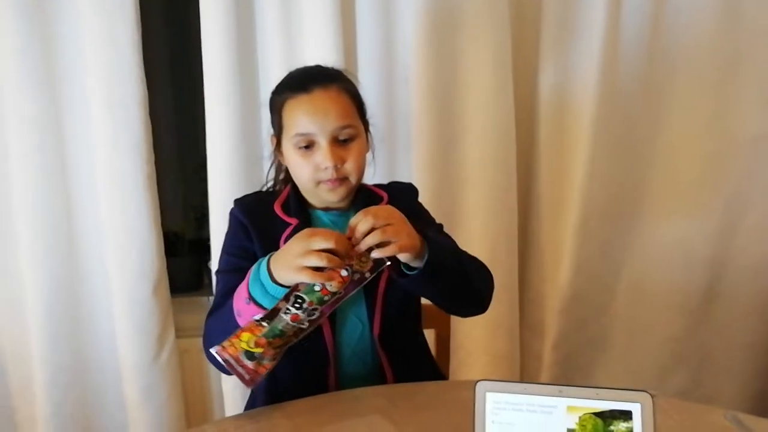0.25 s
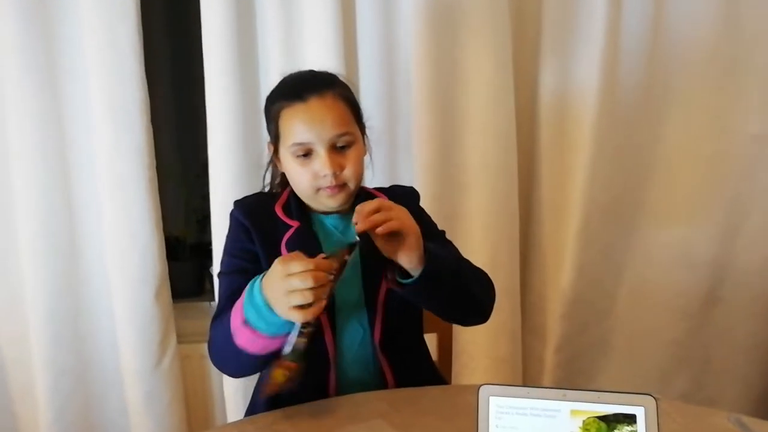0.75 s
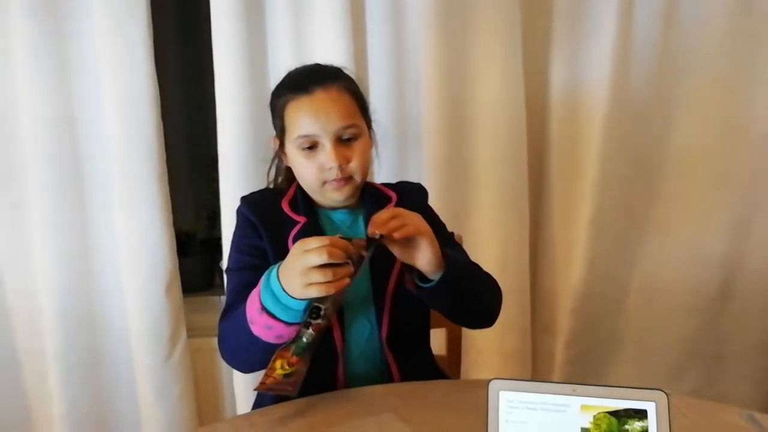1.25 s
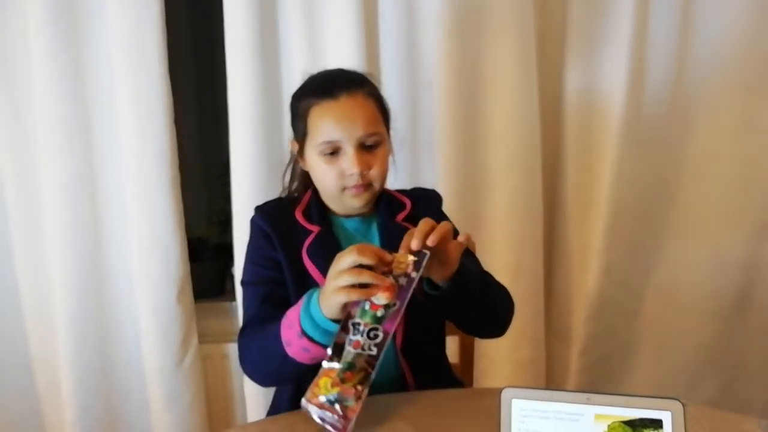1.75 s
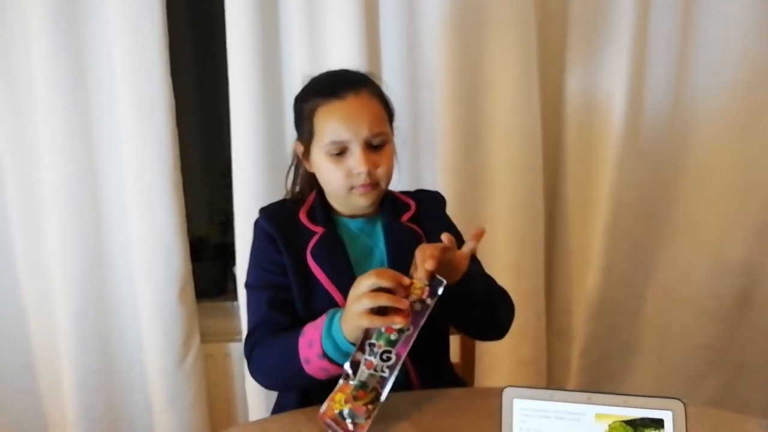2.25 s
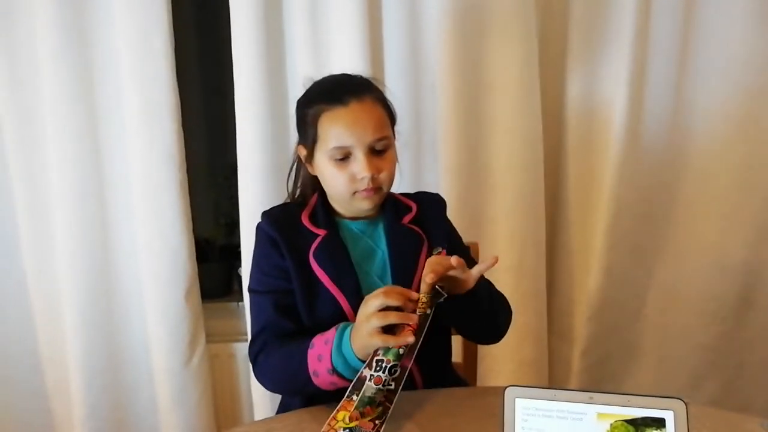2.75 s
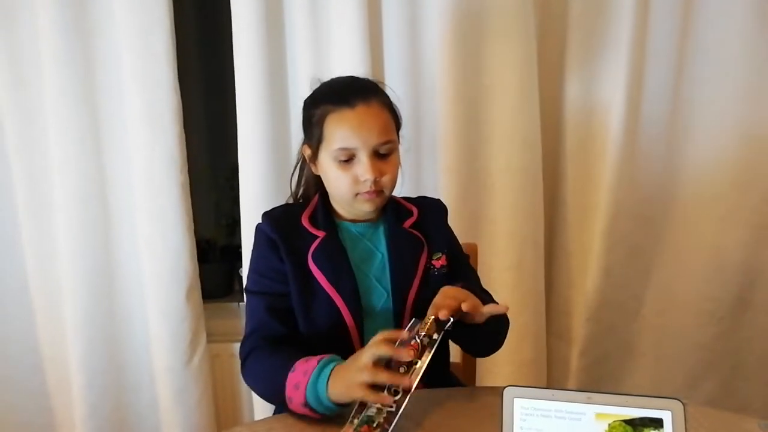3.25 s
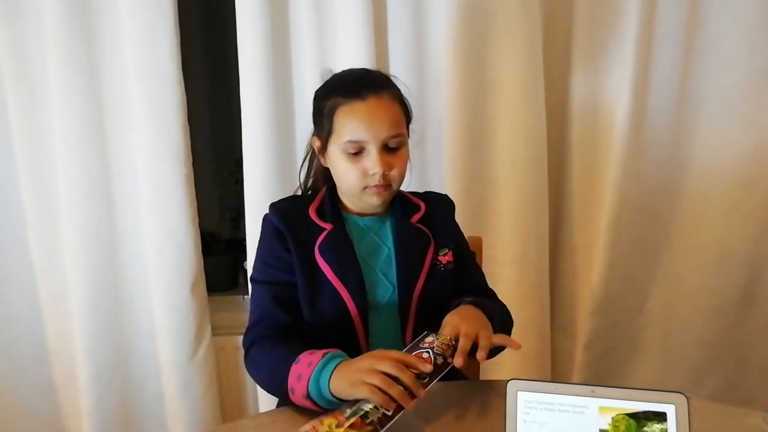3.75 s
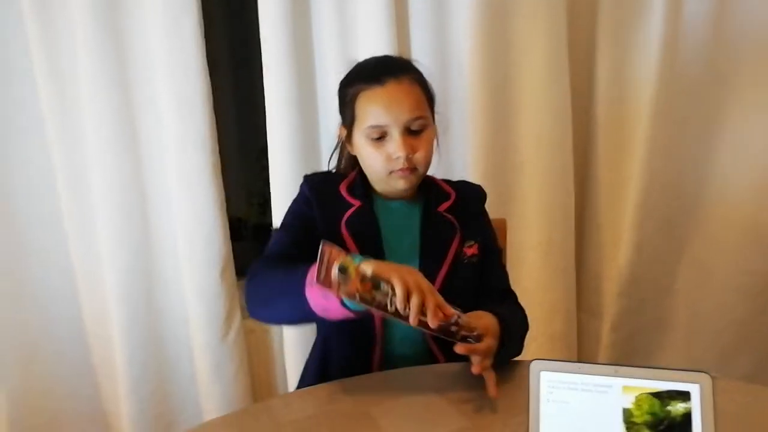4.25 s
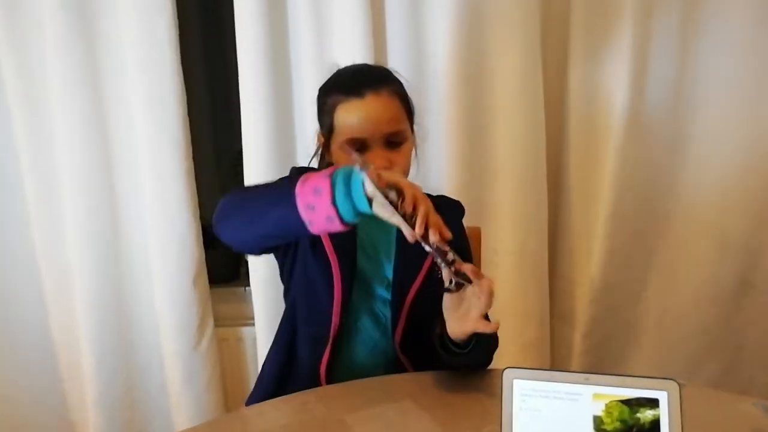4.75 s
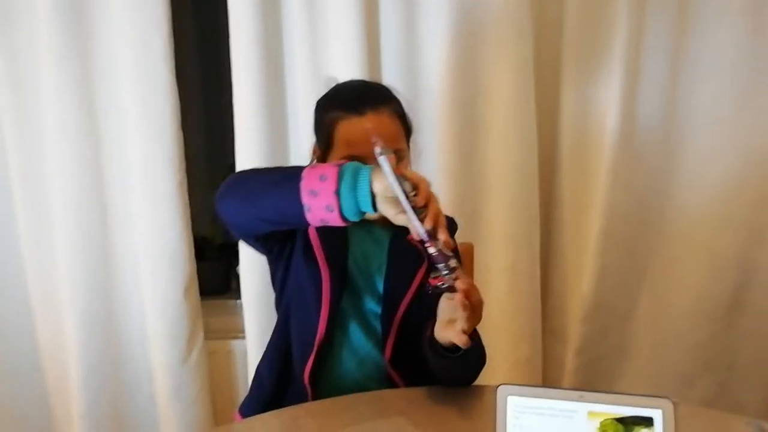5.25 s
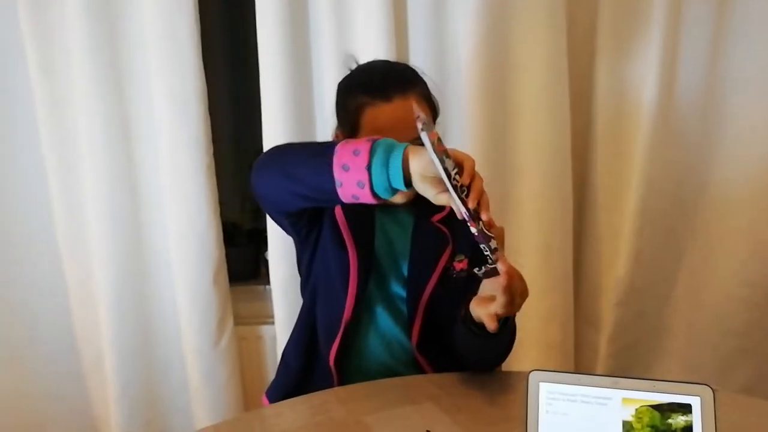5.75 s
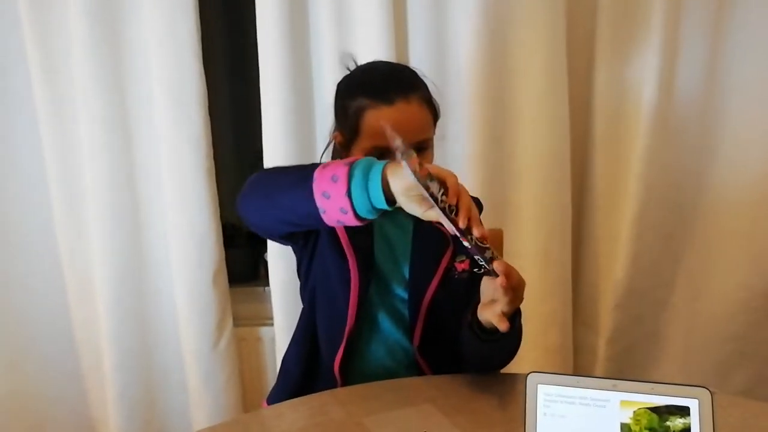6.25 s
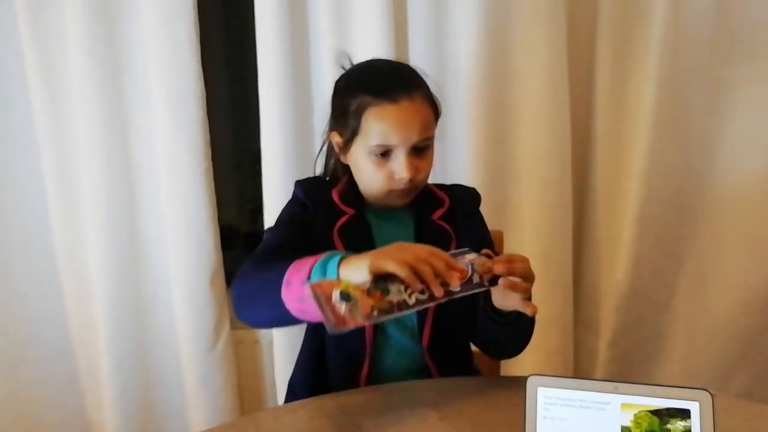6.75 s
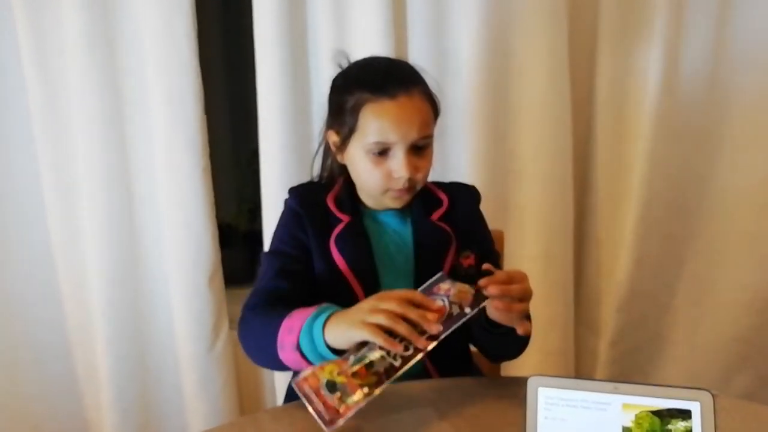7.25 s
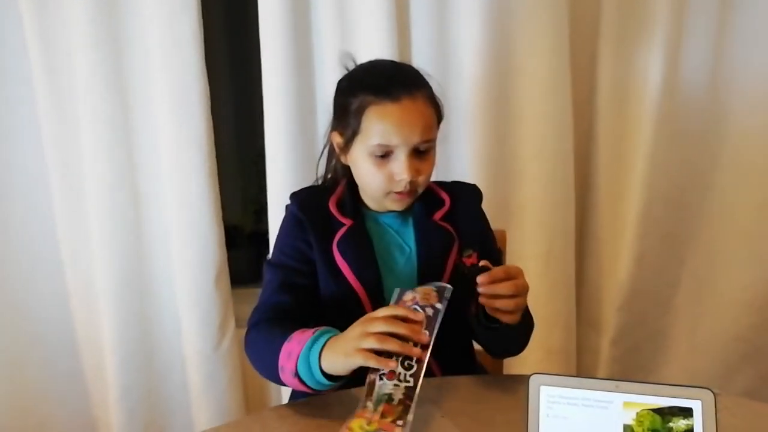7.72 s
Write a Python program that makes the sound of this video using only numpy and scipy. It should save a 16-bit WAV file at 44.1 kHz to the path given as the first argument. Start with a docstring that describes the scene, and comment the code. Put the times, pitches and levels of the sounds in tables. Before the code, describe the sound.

A stiff plastic snack packet is pulled and twisted by hand, giving sharp irregular crackles and snaps in a quiet room, thinning out near the end.

```python
"""In a quiet, curtained room, a plastic snack packet is pulled and twisted open by hand at a table.
Buckling creases in the stiff film are short noise bursts with a ring; many tiny ones make the crackle.
A table bounce and a decaying tail answer both. The bag's flaps are fading bands of noise, the dry knocks
are damped tones with a click, and the rumbling sleeves, room air and microphone hiss are shaped noise."""
import sys
import numpy as np
from scipy import signal
from scipy.fft import rfft, irfft
from scipy.io import wavfile

SR = 44100
rng = np.random.default_rng(int(sys.argv[2]) if len(sys.argv) > 2 else 0)


def unload_audio(sound):
    """Save the sound as a 16-bit wav file, at the path given as the first command line argument."""
    columns = np.transpose(np.atleast_2d(sound))
    # keep every value between -1 and 1, then stretch to whole-number steps
    steps = np.round(np.clip(columns, -1, 1) * 32767)
    wavfile.write(sys.argv[1], SR, steps.astype(np.int16))


N = 352024

# large creases that buckle: (time [s], relative level [dB], body gain up to 1.6 kHz [dB],
# edge gain from 8 kHz up [dB], ring of the flipped panel [Hz])
CREASES = [(0.0062, -17.5, -3, 6, 6000), (0.374, -27, 3.5, -0.5, 4200), (0.4198, -26.5, -0.5, 6.5, 2950),
           (0.486, -20.5, 0.5, 4.5, 5070), (0.5627, -29.5, 11, 2.5, 1970),
           (0.5932, -34.5, -6.5, -2.5, 9000), (0.684, -36, 10, -11, 1080), (0.7107, -22, 5.5, -3, 2070),
           (0.7192, -19, 0.5, 7.5, 3770), (0.7475, -21, 4.5, 0.5, 5130), (0.7624, -21, 1, 5.5, 9600),
           (0.7723, -19, -24, 6, 9660), (0.793, -18.5, -19.5, 10, 6800), (0.963, -31, 1, -1, 5950),
           (0.986, -33, 2, -10, 4270), (1.2, -46.5, 9, -9, 3730), (1.2237, -47, 11, -23, 4700),
           (1.4493, -27.5, -6, -4.5, 7500), (1.4913, -22, -4.5, -10, 3250), (1.5658, -29, 11, -0.5, 3740),
           (1.799, -34, 4, 0, 3270), (1.816, -31, 9.5, -5, 4760), (1.9064, -42.5, -12, -1, 5030),
           (1.9525, -41, -2, -4, 4700), (1.9768, -33, 5, -28, 3200), (2.0008, -24, 2.5, 0, 4700),
           (2.2636, -57.5, -28, 11, 7900), (2.45, -27, -7.5, -5.5, 4700), (2.506, -23, -4, 2, 5800),
           (2.5157, -15, -3.5, -1, 10300), (2.593, -21.5, -1.5, -3.5, 2330), (2.613, -18.5, 4, 0.5, 3680),
           (2.649, -14, -2, -5, 9900), (2.6832, -15.5, -12, 3, 3840), (2.9035, -20.5, -21, -1, 2880),
           (2.9276, -22.5, -3, -26, 3600), (2.9553, -32.5, 2, -2, 3400), (2.9767, -27.5, 9, 2.5, 2440),
           (3.042, -37, 4, -2, 3340), (3.12, -35.5, 13.5, 1.5, 2640), (3.1343, -33, -6.5, -3, 2860),
           (3.2227, -30, -7, 4.5, 4360), (3.4024, -29.5, 3.5, 0.5, 4330), (3.443, -28, 9.5, -8, 6840),
           (3.5132, -14, -15, -2, 8700), (3.5895, -17.5, -5, 8, 6340), (3.7052, -34.5, 2.5, -3, 6400),
           (3.7871, -25.5, 5, 6.5, 1400), (3.7975, -12.5, -10, -13.5, 3000), (3.8132, -19.5, 2, 1.5, 7240),
           (3.879, -29.5, -15, -3, 4300), (3.8929, -24.5, 8.5, -2, 2700), (3.9614, -17, -2, -13, 2970),
           (4.0169, -21.5, 10.5, 2, 4020), (4.0473, -21, 5.5, -0.5, 3200), (4.093, -25.5, -17, -4.5, 4400),
           (4.179, -34.5, 5, -3, 3920), (4.19, -16.5, 4, -4.5, 3900), (4.3697, -17.5, 1.5, -1.5, 5530),
           (4.4631, -38.5, 23, 7, 3400), (4.4934, -34, 0, 9, 4300), (4.5421, -20.5, -1.5, -21, 2300),
           (4.5513, -23, -21, 0.5, 6300), (4.5643, -21.5, 2, -3.5, 3340), (4.685, -30.5, 8.5, -5.5, 8900),
           (4.729, -24.5, 3.5, -1, 6400), (4.809, -26, -2.5, 11, 5670), (4.8361, -23.5, 1.5, -5, 4600),
           (5.1336, -45, -6, 2, 6640), (5.2423, -40.5, 0, 4, 5400), (5.3694, -33, 10, -1, 6950),
           (5.3924, -28.5, -6, 6.5, 2860), (5.469, -21, -5, -6.5, 2460), (5.4982, -23, -10, 4, 2900),
           (5.509, -20, -5, 0, 2700), (5.5189, -19, -5, -5, 6100), (5.549, -21.5, -3.5, -31, 2850),
           (5.6499, -24, -21, 6, 6060), (5.7542, -35, -22, -0.5, 9500), (5.8105, -40.5, -12, 7, 6360),
           (5.833, -32, -6, 4, 2960), (5.8702, -27, 7.5, -22, 1380), (5.8851, -27.5, 3.5, 9, 3000),
           (6.0396, -42.5, 15, -3, 1350), (6.077, -48, -19, 11, 1400), (6.0888, -28.5, 12, -5.5, 2900),
           (6.12, -34, 8, -14, 2290), (6.278, -41, 3, 7, 7700), (6.3704, -34.5, 2, -9, 2100),
           (6.4636, -38, -49, 10, 5860), (6.5374, -34.5, -29, 4.5, 5000), (6.6272, -29.5, -42, 8, 5370),
           (6.677, -33, -24, -4, 5970), (6.7798, -45, 4.5, -3, 3830), (6.8564, -41.5, -2, 3, 4430),
           (7.1478, -47, 2, 8, 2600), (7.32, -39.5, -29, 8.5, 5700), (7.415, -43.5, 9, -7, 2400)]


def snaps(peak_db, level_db=-4.0, peak_octaves=0.15, scatter_db=1, size=512):
    """Snap-through buckling: wide panels give body, tight folds give edge, and the panel rings briefly."""
    out = np.zeros((2, N))
    for s, db, body_db, edge_db, ring_hz in CREASES:
        burst = buckle(crack_s=0.0005, ring_s=0.0017, ring_db=2, same=0.85)
        tone = [(1600, body_db), (3200, 0.0029), (5500, 0.015), (8000, edge_db)]

        def shape_db(hz):
            octaves_away = np.log2((hz + 1) / ring_hz)
            return read(tone, hz) + peak_db / (1 + (octaves_away / peak_octaves) ** 2)

        snap = colour(np.pad(burst, ((0, 0), (0, size))), shape_db, size=512)
        # what one port gains the other loses, on average in favour of the left
        balance_db = scatter_db * rng.uniform(-0.47, 1) * np.array([[1], [-1]])
        add(out, s, snap * gain_of(level_db + db + balance_db))
    return out


def buckle(crack_s, ring_s, ring_db, same, size=256):
    """Impulsive release: a crease flips with a crack and a few milliseconds of flutter, both decaying."""
    t = np.arange(size) / SR
    decay = np.exp(-t / crack_s) + gain_of(ring_db) * np.exp(-t / ring_s)
    left, right = pair(size, same) * decay
    lag = rng.integers(4)  # the right port hears it 0 to 3 samples later
    return np.array([evened(left), evened(np.pad(right, (lag, 0))[:size])])


# resonances of the bag's air pocket, sounded by sliding film: (frequency [Hz], width [Hz], level [dB])
AIR_POCKET = [(1280, 110, -4), (3135, 160, -6)]
# how strongly the pocket rings: (time [s], level before flutter [dB])
POCKET_RINGING = [(0, -23), (4.9, -12), (5.3, -10), (6, -9.5), (6.3, -13), (6.6, -25.5)]


def crackle(level_db=-2, rub_db=-12, wander=0.074, wander_hz=7, flutter_db=3, flutter_hz=35,
            patchy_db=2, patchy_hz=55):
    """Amplitude modulation: finger work drives tiny creases, sliding hiss and the air pocket's resonance."""
    bend = 1 + wander * drift(wander_hz)
    flutter = gain_of(follow(POCKET_RINGING) + flutter_db * drift(flutter_hz))
    pocket = 0
    for hz, width, db in AIR_POCKET:
        pocket = pocket + gain_of(db) * evened(resonate(pair(N, 0.24), hz * bend, width))
    rub = gain_of(rub_db) * pair(N, 0.98)
    spectrum = rfft(grains() + rub + flutter * pocket)
    # taut film is bright, slack film dull: work() tilts four overlapping bands,
    # and each flickers as the folds shift
    centres = np.array([1200, 2500, 5000, 9000])  # Hz
    hz = np.fft.rfftfreq(N, 1 / SR)
    out = 0
    for centre, share in zip(centres, np.eye(len(centres))):
        band = irfft(spectrum * read(np.transpose([centres, share]), hz), N)
        flicker = gain_of(level_db + patchy_db * drift(patchy_hz))
        out = out + band * flicker * work(np.log2(centre / centres[2]))
    return out


def grains(base_per_s=600, spread_db=3.0, count=20):
    """Clustered shot noise: tiny creases of unequal size and colour, whose rate drifts into clumps."""
    clumps = np.exp(0.9 * drift(60))
    happens = rng.random(N) < base_per_s / SR * clumps
    sizes = gain_of(spread_db * np.minimum(rng.exponential(1, N), 4)) * happens
    kind = rng.integers(0, count, N)
    out = np.zeros((2, N))
    for k in range(count):
        tone = np.transpose([np.geomspace(600, 11000, 12), 5 * rng.standard_normal(12)])  # Hz, dB
        burst = buckle(crack_s=0.00027, ring_s=0.0053, ring_db=-11.0, same=0.51)
        grain = colour(burst, lambda hz: read(tone, hz), size=256)
        out += signal.oaconvolve((sizes * (kind == k))[None], evened(grain), axes=1)[:, :N]
    return evened(out)


# pulls and twists of the fingers: (start [s], length [s], relative level [dB], brightness [dB/octave])
FINGER_PULLS = [(0.577, 0.076, -54, -8.5), (0.738, 0.098, -25.5, -1), (0.97, 0.0093, -44, -3),
                (1.088, 0.011, -52.5, -2), (1.245, 0.023, -52.5, -1.5), (1.384, 0.049, -62, -8),
                (1.606, 0.027, -32.5, -2), (1.912, 0.061, -44.5, 0), (2.263, 0.36, -53.5, -2),
                (2.619, 0.064, -32, 3.5), (2.768, 0.19, -53.5, -1.5), (2.896, 0.063, -37, -0.5),
                (3.114, 0.13, -40.5, -3), (3.348, 0.13, -40.5, 0), (3.523, 0.071, -36, -0.5),
                (3.73, 0.07, -38.5, -5.5), (4.014, 0.078, -53, 2), (4.265, 0.07, -34, -.5),
                (4.428, 0.06, -36.5, -4), (4.529, 0.044, -29, -1.5), (4.625, 0.35, -39, 0),
                (5.09, 0.44, -49.5, -0.5), (5.385, .04, -36, -1), (5.489, 0.12, -37, 2),
                (5.658, 0.051, -33, -0.5), (5.854, 0.074, -36, 1), (5.95, 0.08, -47, -5.5),
                (6.099, 0.013, -41.5, -5.5), (6.227, 0.044, -49.5, 1.5), (6.552, 0.051, -43.5, -4),
                (6.672, 0.011, -51.5, -7.5), (6.82, .03, -58, -4), (7.15, 0.019, -52.5, -5),
                (7.202, 0.048, -51.5, -3), (7.254, 0.097, -51, -2.5), (7.721, 0.073, -59.5, -0.5)]
GRIP_DB_PER_S, LET_GO_DB_PER_S = 645, 269  # a pull builds quickly and lets go more slowly
HOLDING_DB, HOLDING_TILT_DB = -69, -5.5  # packet merely held: relative level, brightness per octave
# a flurry of tiny creases around every snap; its brightness partly follows the snap's
FLURRY_DB, FLURRY_DB_PER_S, FLURRY_RISE_DB_PER_S = -11, 377.5, 6000
FLURRY_TILT_DB, FLURRY_TILT_SHARE = -3.5, 0.13


def work(octave):
    """Power summation of holding, pulls and flurries, in a band so many octaves above 5 kHz."""
    t = np.arange(0, N / SR, 1 / 1000)
    power = gain_of(HOLDING_DB + HOLDING_TILT_DB * octave) ** 2
    for s, length, db, tilt_db in FINGER_PULLS:
        build_db = GRIP_DB_PER_S * (t - s)
        release_db = LET_GO_DB_PER_S * (s + length - t)
        shape_db = np.minimum(np.minimum(build_db, release_db), 0)
        power = power + gain_of(db + tilt_db * octave + shape_db) ** 2
    for s, db, body_db, edge_db, _ in CREASES:
        shape_db = np.minimum(FLURRY_RISE_DB_PER_S * (t - s), FLURRY_DB_PER_S * (s - t))
        tilt_db = FLURRY_TILT_DB + FLURRY_TILT_SHARE * (edge_db - body_db)
        power = power + gain_of(db + FLURRY_DB + tilt_db * octave + shape_db) ** 2
    return np.interp(np.arange(N) / SR, t, np.sqrt(power))


# what the film radiates: (frequency [Hz], gain [dB])
FILM_RADIATION = [(60, -48.5), (220, -25), (480, -24), (800, -16.5), (1300, -11), (2000, -8), (3100, -3.5),
                  (4200, -1), (6500, 0.5), (8000, 0.5), (9500, 1), (10600, -12), (12000, -17), (15500, -28)]


def radiate(x):
    """Radiation efficiency: thin film gives off little bass and most strongly the upper treble."""
    return colour(x, lambda hz: read(FILM_RADIATION, hz))


def varied_echo(x, count=4):
    """Equal-power crossfading: steadily through a few random echo patterns, so no fixed colouring stands out."""
    place = np.arange(N) / SR * 7  # seven patterns a second
    out = 0
    for k in range(count):
        away = abs((place - k) % count - count / 2)
        out = out + room(x * np.cos(np.pi / 2 * np.minimum(away, 1)))
    return out


# the room's echo: (frequency [Hz], relative level [dB], decay time to -60 dB [s])
ROOM_DECAY = [(250, 0.5, 0.075), (1000, -4, 0.37), (2200, -5, 0.21), (4940, -7, 0.21), (9000, -6.5, 0.22),
              (14000, -6.5, 0.12)]


def room(x, table_s=0.0064, table_db=-13, first_s=0.0056, size=22050):
    """Reverberation: one clear table reflection, and a short, exponentially decaying tail of sparse echoes."""
    t = np.arange(size) / SR
    sparse = rng.random((2, size)) < 5000 / SR  # about 5000 reflections a second
    taps = rng.choice([-1., 1.], (2, size)) * sparse * (t > first_s)
    hz, frame_s, z = signal.stft(taps, SR, nperseg=128)
    t60 = read(ROOM_DECAY, hz, axis=2)[:, None]
    decay_db = -60 * np.maximum(frame_s - first_s, 0) / t60
    energy = t60 * SR / np.log(10 ** 6)  # of the decay, so that long tails are not louder in total
    z = z * gain_of(read(ROOM_DECAY, hz)[:, None] + decay_db) / np.sqrt(energy)
    tail = signal.istft(z, SR, nperseg=128)[1][:, :size] / np.sqrt(np.mean(taps ** 2))
    bounce = buckle(crack_s=0.0009, ring_s=0.003, ring_db=-8.0, same=1.0)
    add(tail, table_s, gain_of(table_db) * bounce / np.linalg.norm(bounce[0]))
    return signal.fftconvolve(x, tail, axes=1)[:, :N]


# the two microphone ports differ in colour: (frequency [Hz], left minus right [dB])
PORT_DIFFERENCE = [(200, 0), (600, -4), (1200, 1), (4200, -7.5), (6400, -6), (8000, -1), (9700, 5.5),
                   (12000, -2.5)]


def ports(x):
    """Interchannel level difference: half is added to the left port and half taken from the right."""
    return colour(x, lambda hz: np.outer([0.5, -0.5], read(PORT_DIFFERENCE, hz)))


# the whole bag flexes and pushes air: (time [s], relative level [dB], centre frequency [Hz])
BAG_FLEXES = [(0.713, -46.5, 218), (.752, -48, 264), (1.55, -55, 288), (2.645, -49.5, 350),
              (3.975, -45.5, 810), (4.348, -50, 250), (6.69, -60, 497)]


def puffs(level_db=0, fade_s=0.03, octaves=0.4):
    """Volume displacement: a flex of the whole bag gives a soft low flap of band noise that dies away."""
    out = np.zeros((2, N))
    t = np.arange(SR // 4) / SR
    for s, db, centre_hz in BAG_FLEXES:
        def shape_db(hz):
            return np.maximum(-3 * (np.log2((hz + 1) / centre_hz) / octaves) ** 2, -50)

        air = colour(pair(len(t), 0.3), shape_db)
        add(out, s, gain_of(level_db + db) * evened(air) * np.exp(-t / fade_s))
    return out


# dry knocks and bumps: (time [s], relative tick level [dB], tick pitch [Hz], thump level [dB],
# thump pitch [Hz])
DRY_KNOCKS = [(2.142, -42, 1280, -50, 160), (2.1632, -42, 1270, -48.5, 160), (3.910, -31.5, 1650, -31, 125),
              (4.156, -45.5, 1170, -41, 107), (4.2913, -38, 750, -32, 130),
              (4.3429, -24.5, 1140, -25.5, 138), (4.755, -44, 900, -45, 120),
              (4.793, -38.5, 1120, -48, 150), (5.522, -42, 800, -35, 204), (6.255, -52, 1310, -55, 110),
              (6.301, -53, 1060, -53, 131), (6.458, -54, 1140, -67, 150), (6.854, -48, 1140, -56, 180),
              (7.024, -46.5, 1060, -75, 198)]
# the knocks' short ring: (multiple of the tick pitch [ratio], relative level [dB], decay to -60 dB [s])
TICK_MODES = [(.68, -10.5, 0.018), (1, 2.5, 0.013), (2.2, -11.5, 0.0024)]


def knocks(thump_s=0.0017, tick_db=-2, click_db=-13, click_s=0.00079, lag_s=0.00081):
    """Damped modes: a click, a woody tick and a low push late on the left, too close to stir the room."""
    out = np.zeros((2, N))
    t = np.arange(SR // 10) / SR
    late = np.maximum(t - np.array([[lag_s], [0]]), 0)
    push = 2 * late / thump_s * np.exp(-late / thump_s)
    for s, hard_db, tick_hz, push_db, thump_hz in DRY_KNOCKS:
        tick = 0
        for ratio, db, t60 in TICK_MODES:
            tick = tick + gain_of(db - 60 * t / t60) * np.cos(2 * np.pi * tick_hz * ratio * t)
        click = gain_of(click_db) * pair(len(t), 0.58) * np.exp(-t / click_s)
        thump = push * np.sin(2 * np.pi * thump_hz * late)
        add(out, s, gain_of(hard_db + tick_db) * (tick + click) + gain_of(push_db) * thump)
    return out


# rustling cloth: (frequency [Hz], relative level [dB])
CLOTH_SPECTRUM = [(20, -16), (55, 2), (170, 0), (400, -14.5), (2000, -48)]
# sleeves and hands moving: (time [s], relative level [dB])
SLEEVE_MOTION = [(0, -55.5), (.26, -62), (.45, -56), (1.05, -59), (1.17, -75.5), (1.56, -65.5),
                 (1.9, -72.5), (3.7, -72), (3.95, -69), (4.33, -58.5), (5, -61), (5.08, -67), (5.2, -58.5),
                 (5.35, -68), (5.6, -54.5), (5.9, -75.5), (6.65, -62.5), (6.9, -76.5)]


def sleeves(level_db=-1, lumps_db=5.0, lumps_hz=45):
    """Friction noise: a soft rumble of cloth and moving hands, made lumpy by a random level."""
    rumble = colour(diffuse(), lambda hz: read(CLOTH_SPECTRUM, hz), size=8192)
    lumpy = rumble * gain_of(lumps_db * drift(lumps_hz))
    return evened(lumpy) * gain_of(level_db + follow(SLEEVE_MOTION))


# still room and microphone hiss: (frequency [Hz], relative level [dB])
QUIET_SPECTRUM = [(12, -39), (20, -1), (77, -9), (107, -15), (228, -26), (293, -17.5), (574, -25),
                  (1330, -25.5), (9140, -27), (16000, -34.5)]


def stillness(level_db=-73.5):
    """Stationary background noise: low room noise and microphone hiss, its level set on the port average."""
    air = colour(diffuse(), lambda hz: read(QUIET_SPECTRUM, hz), size=8192)
    return gain_of(level_db) * air / air.mean(0).std()


def diffuse():
    """Diffuse-field coherence: noise shared by the ports in the bass and unrelated higher up."""
    a, b = rng.standard_normal((2, N))
    apart_db = [(40, -14.0), (120, -11.0), (280, 2), (3000, 2)]  # Hz, dB
    apart = colour(b[None], lambda hz: read(apart_db, hz))[0]
    return np.array([a + apart, a - apart])


def pair(size, same):
    """Partial correlation: left and right noise with a shared part."""
    a, b = rng.standard_normal((2, size))
    return np.array([a, same * a + np.sqrt(1 - same ** 2) * b])


def drift(rate_hz):
    """Random modulation: normal random values, rate_hz of them a second, joined by straight lines."""
    at = np.arange(N) / SR * rate_hz
    return np.interp(at, np.arange(4096), rng.standard_normal(4096))


def resonate(x, hz, width):
    """Heterodyne resonance: x is shifted down by the curve hz, smoothed and shifted back."""
    turn = np.exp(2j * np.pi * np.cumsum(hz) / SR)
    r = np.exp(-np.pi * width / SR)
    return 2 * (turn * signal.lfilter([1 - r], [1, -r], x / turn)).real


def colour(x, shape_db, size=2048):
    """Minimum-phase filtering: a causal filter whose gain in dB is the function shape_db of frequency."""
    log_gain = np.log(gain_of(shape_db(abs(np.fft.fftfreq(size, 1 / SR)))))
    taps = np.fft.ifft(np.exp(np.conj(signal.hilbert(log_gain)))).real
    return signal.oaconvolve(x, np.atleast_2d(taps), axes=1)[:, :x.shape[1]]


def gain_of(db):
    """Decibel law: level to amplitude."""
    return 10 ** (np.asarray(db) / 20)


def evened(x):
    """Normalisation to rms 1."""
    return x / np.sqrt(np.mean(x ** 2) + 1e-20)


def read(points, hz, axis=1):
    """Interpolation of one column of a spectrum table on a log-frequency axis."""
    columns = np.transpose(points)
    return np.interp(np.log(hz + 1), np.log(columns[0] + 1), columns[axis])


def follow(points):
    """Linear interpolation of a curve over time, at every sample."""
    times, values = np.transpose(points)
    return np.interp(np.arange(N) / SR, times, values)


def add(mix, s, sound):
    """Superposition: mixes a sound in at time s."""
    part = mix[:, max(round(s * SR), 0):][:, :sound.shape[-1]]
    part += sound[..., :part.shape[1]]


def scene():
    """Superposition of the packet and its echo through two unlike ports, the low sounds and the background."""
    fine = crackle()
    direct = radiate(snaps(peak_db=9.0) + fine)
    # the room gets its own random draw of the same snaps
    into_room = radiate(snaps(peak_db=9.0) + fine)
    packet = ports(direct + varied_echo(into_room))
    return packet + puffs() + knocks() + sleeves() + stillness()


def record(dry):
    """Soft saturation and band limiting: the sharpest peaks are rounded off, then a low-pass at 16.2 kHz."""
    low_pass = signal.firwin(255, 16200, window=("kaiser", 9), fs=SR)
    return signal.oaconvolve(np.tanh(dry), low_pass[None], "same")


dry = scene()
out = record(dry)
unload_audio(out)
```